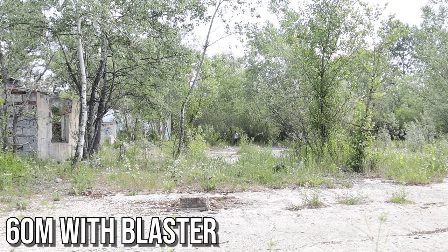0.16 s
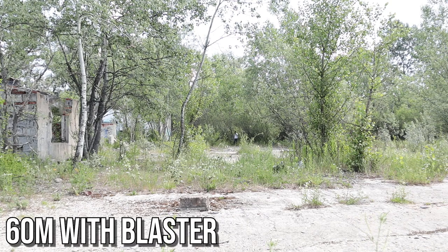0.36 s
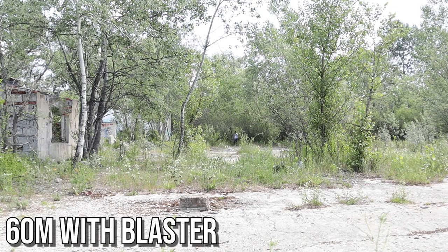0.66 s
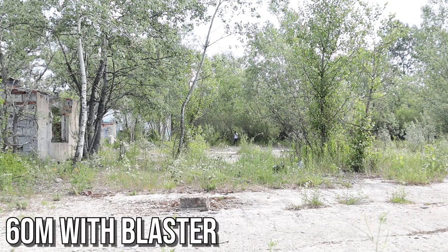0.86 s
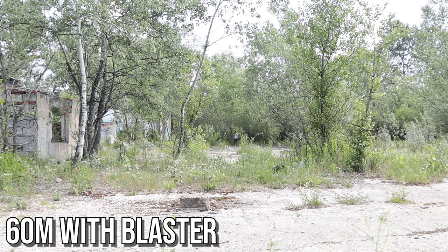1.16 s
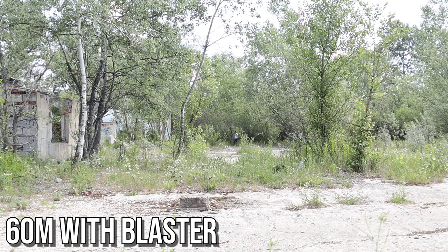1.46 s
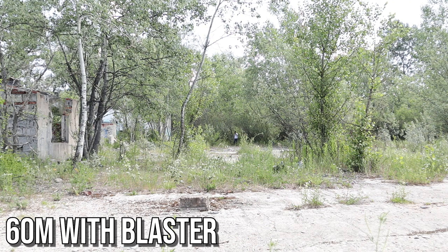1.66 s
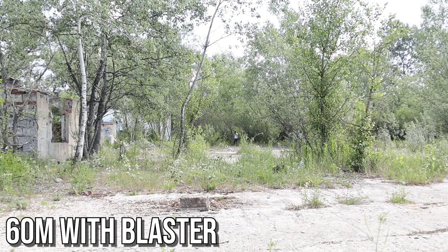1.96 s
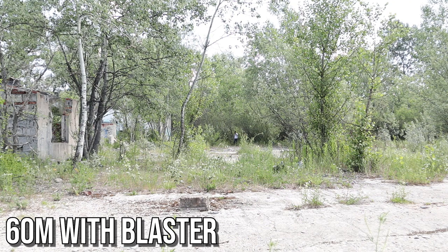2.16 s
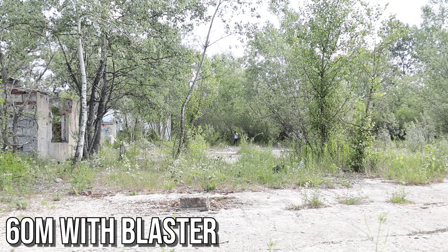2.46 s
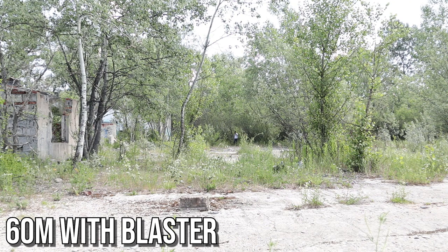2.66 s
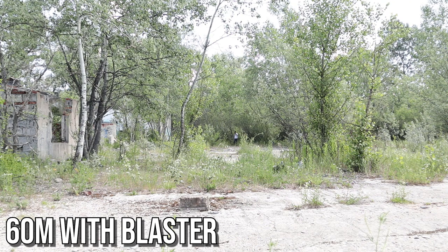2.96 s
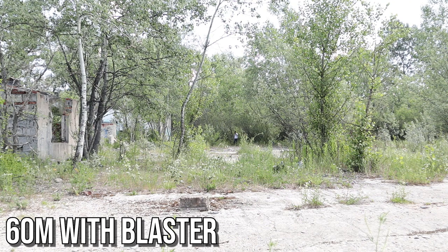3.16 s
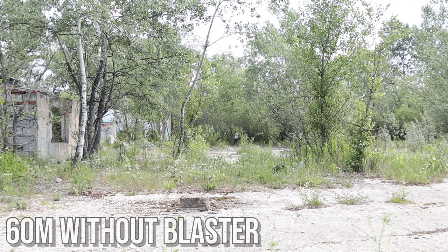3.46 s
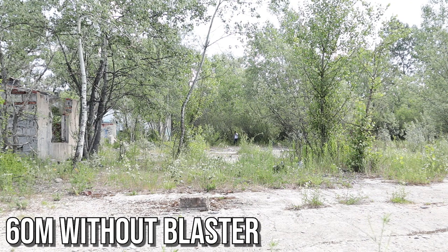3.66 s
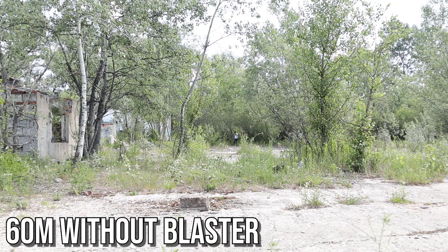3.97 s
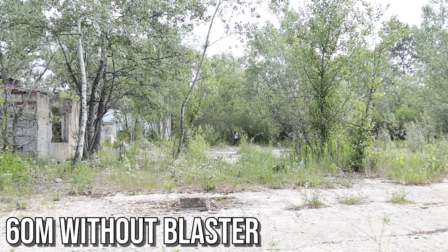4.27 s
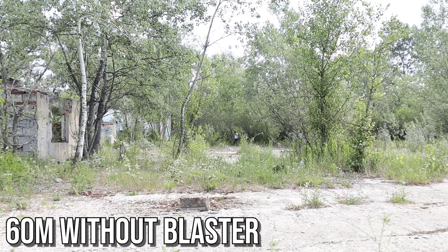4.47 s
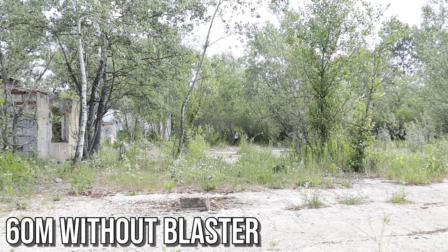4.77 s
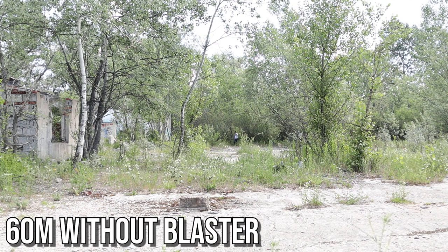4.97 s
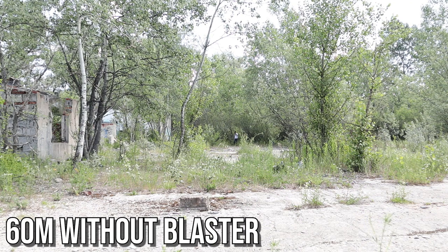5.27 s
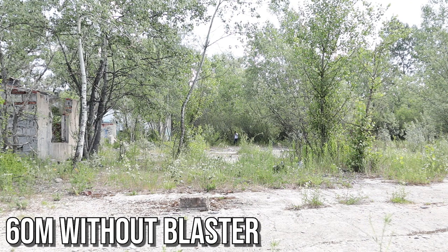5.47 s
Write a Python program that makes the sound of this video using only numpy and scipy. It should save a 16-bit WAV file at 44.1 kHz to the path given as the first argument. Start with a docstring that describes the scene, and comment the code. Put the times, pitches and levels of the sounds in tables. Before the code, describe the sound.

Single airsoft shots snap and echo among trees, three sharper then three softer, with pellet hits and quiet birdsong.

```python
"""An electric airsoft rifle fires single shots across an overgrown lot: blaster cup on, then bare muzzle.
Each shot is a short gear whine, the piston's slam and a pop of air; walls and trees throw it back.
Pellets strike nearby, some followed by a soft hissy echo or a faint rustle. A warbler whistles a
falling phrase and a second bird calls far off, over faint outdoor air and a low rumble."""
import sys
import numpy as np
from scipy import signal
from scipy.io import wavfile
from scipy.ndimage import uniform_filter1d

SR = 44100
rng = np.random.default_rng(int(sys.argv[2]) if len(sys.argv) > 2 else 0)


def transcribe(signal):
    """Save signal, clipped to [-1, 1], as a 16-bit WAV file at the path in sys.argv[1]."""
    frames = np.atleast_2d(signal).T
    limited = np.clip(frames, -1, 1)
    pcm = np.round(limited * 32767).astype(np.int16)
    wavfile.write(sys.argv[1], SR, pcm)


N = 247842

# (slam time [s], pop gain [dB], gearbox gain [dB], muzzle [0 blaster cup, 1 bare])
SHOTS = [(-.101, 0, -12, 0), (0.7495, -0.5, -11.5, 0), (1.674, -1, -11.5, 0), (2.645, 0, -11, 0),
         (3.5942, -7.5, -11.5, 1), (4.4408, -7.5, -11, 1), (5.3884, -7.5, -11.5, 1)]


def shot(pop_db, gearbox_db, bare, wall_response, lead_s):
    """One firing cycle with its echoes; the piston slams at lead_s."""
    mechanism = amp(gearbox_db) * gearbox(lead_s)
    pop, ringing = muzzle(pop_db, bare, lead_s)
    echoes = signal.fftconvolve(pop, wall_response)[:SR]
    # the pop is aimed down range; the gearbox radiates all round and feeds the trees more
    radiated = mechanism + amp(-12.5) * pop
    scatter = trees(radiated, near_db=-4.5, far_db=-10, onset_s=.012, patchy_db=1.5, size=128)
    blurred_ring = trees(ringing, near_db=-5, far_db=-8, onset_s=.017, patchy_db=4, size=512)
    return mechanism + pop + ringing + puff(lead_s) + echoes + scatter + blurred_ring


# pop spectrum per muzzle: (frequency [Hz], gain [dB])
CUP_POP = [(60, -70), (400, -31.5), (950, -21), (1300, 4), (1600, 4.5), (2200, -1.5), (3000, -4), (3800, 1),
           (5000, -9), (6500, -27), (8000, -31), (10500, -14.5), (13000, -41), (16000, -47)]
BARE_POP = [(60, -21.5), (800, -20), (1300, -13), (2200, -7), (2750, -13.5), (3300, -12), (4300, -10),
            (5100, 1.5), (5900, -10), (8000, -25), (10000, -35), (16000, -64)]
# muzzle modes: (frequency [Hz], gain [dB], t60 [s])
CUP_MODES = [(1335, -39, .06), (1457, -38, .075), (1604, -36, .03), (1715, -41, .05), (1900, -41, .05),
             (3892, -44, .06)]
BARE_MODES = [(1631, -41, .035), (3321, -39, .09), (3790, -39, .03), (5071, -30, .025), (5405, -39, .06)]


def muzzle(db, bare, lead_s):
    """The piston's crack leaves through the muzzle and sets it ringing."""
    spectrum, modes = (BARE_POP, BARE_MODES) if bare else (CUP_POP, CUP_MODES)
    pop, ringing = np.zeros((2, SR))
    add(pop, lead_s, amp(db) * click(spectrum))
    add(ringing, lead_s, amp(db) * ring(modes))
    return pop, ringing


# motor start, piston release, piston run, slam, shell chatter: (time from slam [s], gain [dB], decay [s])
KNOCKS = [(-.048, -20.5, 0.0024), (-.0041, -6, .0008), (-.0023, -2.5, .002), (0, -1, 0.0025),
          (.0025, -0.5, 0.0093)]
# gearbox shell response: (frequency [Hz], gain [dB])
SHELL = [(30, -24), (100, -3), (300, -36), (700, -8.5), (1100, -4), (1500, -2), (2000, -3), (2700, -4.5),
         (3600, 3), (4500, 0), (5400, 2), (6500, -8.5), (8000, -15.5), (11500, -14), (16000, -37)]


def gearbox(lead_s, wind_up_s=.048):
    """The motor winds the spring and the piston slams; both sound through the shell."""
    drive = np.zeros(SR)
    add(drive, lead_s - wind_up_s, gear_whine(wind_up_s))
    for time_s, db, decay_s in KNOCKS:
        add(drive, lead_s + time_s, amp(db) * rattle(decay_s))
    return signal.fftconvolve(drive, click(SHELL))[:SR]


def gear_whine(length_s, start_hz=553, limit_hz=2215, spin_up_s=.04, attack_s=.018, release_s=.012):
    """Gear teeth whirr upward, unevenly, as the motor gathers speed."""
    t = np.arange(0, length_s, 1 / SR)
    mesh_hz = limit_hz + (start_hz - limit_hz) * np.exp(-t / spin_up_s)
    jitter = .028 * unit_rms(uniform_filter1d(rng.standard_normal(len(t)), size=90))
    cycles = np.cumsum(mesh_hz * (1 + jitter)) / SR
    teeth = sum(np.cos(2 * np.pi * (k * cycles + rng.random())) for k in range(1, 5))
    grind = band(rng.standard_normal(len(t)), hz=3800, width_hz=6100)
    envelope = np.minimum(t / attack_s, 1) * np.minimum((length_s - t) / release_s, 1)
    return amp(-41.5) * envelope * unit_rms(unit_rms(teeth) + unit_rms(grind))


# puff spectrum: (frequency [Hz], gain [dB])
PUFF = [(30, -9), (150, 7.5), (260, -14), (350, 3), (600, -4.5), (850, 0), (1300, -23), (3000, -3),
        (7000, -23), (11500, -25), (16000, -14)]


def puff(lead_s):
    """Soft air follows the pellet out."""
    out = np.zeros(SR)
    add(out, lead_s + .003, amp(-24.5) * signal.fftconvolve(rattle(decay_s=.0029), click(PUFF)))
    return out


# ground, ruin, tree line: (delay [s], gain [dB], centre [Hz], width [Hz], diffuse share [0-1])
ECHOES = [(.0005, -17, 4500, 6860, 0), (.0038, -13, 2200, 3450, 0.12), (.0069, -9.5, 2000, 3670, 0),
          (.010, -15, 1600, 2470, 0), (0.018, -18, 3440, 2000, 0.8), (.0352, -11, 1450, 110, 0),
          (.0387, -3.5, 1450, 360, 0), (.0442, -10, 1450, 110, 0), (0.065, -30, 2500, 4000, 0.2),
          (0.085, -23, 3480, 4000, 0.49), (.194, -28, 1900, 2500, 0.6), (0.432, -27.5, 1400, 600, 0.39)]


def walls(smear_s=.014):
    """Impulse response of the distinct echoes, each coloured and partly smeared by its surface."""
    response = np.zeros(SR)
    for delay_s, db, hz, width_hz, diffuse in ECHOES:
        bounce = np.sqrt(1 - diffuse) * signal.unit_impulse(SR)
        add(bounce, 0, np.sqrt(diffuse) * rattle(smear_s))
        add(response, delay_s, amp(db) * band(bounce, hz, width_hz))
    return response


# tree scatter spectrum: (frequency [Hz], gain [dB])
SCATTER = [(100, -27), (700, -3.5), (1500, 2), (2500, 1.5), (4000, 2), (5500, 0), (8000, -1), (15000, -4.5)]
# decay of near bushes and far wood: (frequency [Hz], t60 [s])
NEAR_T60 = [(100, 0.073), (700, 0.46), (1500, 0.29), (5000, 0.28), (9000, 0.27), (15000, 0.28)]
FAR_T60 = [(100, .5), (1500, 1.27), (5000, 0.86), (9000, 0.52), (15000, 1.05)]


def trees(x, near_db, far_db, onset_s, patchy_db, size):
    """Countless small reflections: bushes die away quickly, the wood behind them lingers."""
    hz, t, spectrum = signal.stft(x, SR, nperseg=size)
    t = t[t < 1]
    build_up = (1 - np.exp(-(t / onset_s) ** 2)) ** 2
    response = 0
    for db, t60_curve in (near_db, NEAR_T60), (far_db, FAR_T60):
        fade = build_up * amp(-60 * t / curve_at(t60_curve, hz)[:, None]) ** 2
        band_power = amp(db + curve_at(SCATTER, hz)[:, None]) ** 2
        response = response + band_power * fade / fade.sum(1, keepdims=True)
    power = signal.fftconvolve(abs(spectrum) ** 2, response, axes=1)[:, :spectrum.shape[1]]
    noise = signal.stft(rng.standard_normal(len(x)), SR, nperseg=size)[2]
    # clumped trunks reflect unevenly
    clumps = unit_rms(uniform_filter1d(rng.standard_normal(spectrum.shape), size=12, axis=0))
    noise *= amp(patchy_db * clumps)
    return signal.istft(np.sqrt(abs(power)) * noise / noise.std(), SR)[1][:len(x)]


# strikes: (time [s], level [dB], tilt [dB/octave], ring [Hz], ring gain [dB], t60 [s], chatter [dB])
PELLETS = [(0.808, -9, 4, 12600, -28, 0.056, 0.5), (0.882, -11, -3, 5820, -25, 0.025, 1.5),
           (1.2125, -21, 7, 4410, -26, 0.068, 0.5), (1.88, -13.5, -2.5, 2980, -24, 0.029, 9),
           (2.8098, -20, 0.5, 6150, -37, .1, 20), (2.918, -23.5, -5.5, 3450, -28, 0.05, 6),
           (5.09, -34, -4, 5500, -33, .03, 6)]
# strike spectrum before tilt: (frequency [Hz], gain [dB])
STRIKE = [(200, -31), (1200, -15), (2000, -15.5), (2800, -2.5), (4000, -7.5), (5900, 0.5), (7000, -8),
          (10000, -9.5), (12500, -11.5), (16000, -24)]


def pellet(db, tilt_db, ring_hz, ring_db, t60_s, chatter_db):
    """A pellet snaps against something hard, which chatters and rings briefly."""
    hit, contacts = np.zeros((2, SR))
    add(contacts, 0, rattle(decay_s=.0016))
    add(contacts, 0, amp(chatter_db) * rattle(decay_s=.015, size=4096))
    add(hit, 0, unit_energy(signal.fftconvolve(contacts, click(STRIKE, tilt_db))))
    add(hit, 0, ring([(ring_hz, ring_db, t60_s)]))
    hit = amp(db) * unit_energy(hit)
    return hit + trees(hit, near_db=-14, far_db=-12, onset_s=.002, patchy_db=1, size=64)


# two soft echoes, each about 60 ms after a pellet strike, then two faint rustles:
# (time [s], gain [dB], centre [Hz], width [Hz], decay [s])
HISSES = [(0.937, -50, 5400, 2800, 0.02), (1.938, -51.5, 5500, 3220, 0.021), (2.84, -58, 8400, 7000, 0.041),
          (2.96, -62.5, 7460, 4500, 0.026)]


def hiss(db, hz, width_hz, decay_s):
    """Grainy noise swells and fades: a strike's echo off the surroundings, or a faint rustle."""
    age = np.arange(SR // 2) / SR / decay_s
    grains = rng.standard_normal(len(age)) * rng.exponential(1, len(age))
    noise = unit_rms(band(band(grains, hz, width_hz), hz, width_hz))
    envelope = age * np.exp(1 - age) / 2
    return amp(db) * envelope * noise


# syllable contours: (time [s], pitch [Hz], gain [dB]), scaled per note
ARCH = [(0, 4280, -14), (.028, 4480, 2.5), (.048, 5000, -8.5), (.06, 5660, -6), (.076, 5500, -2),
        (.1, 4220, -13)]
SLUR = [(0, 4700, -20), (.028, 4636, -13), (.042, 4616, -0.5), (.075, 4200, -12.5), (.115, 3510, -14.5)]
FLICK = [(0, 2930, -17), (.02, 3000, -12), (.033, 3900, -6.5), (.064, 3970, 0), (.078, 4700, -5)]
SYLLABLES = {"arch": ARCH, "slur": SLUR, "flick": FLICK}
# phrase: (time [s], pitch [ratio], length [ratio], gain [dB], syllable)
NOTES = [(3.765, 1.02, .95, -58.5, "arch"), (3.928, 1.01, 1.0, -54, "arch"),
         (4.105, 0.99, 1.0, -51, "arch"), (4.28, 0.99, 0.99, -44, "slur"), (4.475, 1.0, 1, -44, "slur"),
         (4.668, 0.99, 0.9, -47, "slur"), (4.895, .825, 0.79, -51.5, "slur"),
         (5.03, 1.004, 1.0, -50.5, "flick"), (5.192, .97, 1.0, -49, "flick"),
         (5.362, 0.91, 1.0, -44, "flick")]


def warbler(gain_db=-2.5, waver=.0057, flutter_db=2, echo_s=.046, echo_db=-11.5):
    """Gliding whistles flutter through the leaves; the tree line answers."""
    song = np.zeros(N)
    for start_s, pitch, stretch, note_db, syllable in NOTES:
        times_s, hz, db = np.transpose(SYLLABLES[syllable])
        t = np.arange(0, times_s[-1], 1 / SR / stretch)
        wobble, flutter = unit_rms(uniform_filter1d(rng.standard_normal((2, len(t))), size=160))
        glide_hz = pitch * uniform_filter1d(np.interp(t, times_s, hz), size=400)
        cycles = np.cumsum(glide_hz * (1 + waver * wobble)) / SR
        level_db = gain_db + note_db + np.interp(t, times_s, db) + flutter_db * flutter
        whistle = amp(level_db) * signal.windows.tukey(len(t), .12) * np.sin(2 * np.pi * cycles)
        add(song, start_s, whistle)
        add(song, start_s + echo_s, amp(echo_db) * whistle)
    return song + trees(song, near_db=-6, far_db=-5.5, onset_s=.0079, patchy_db=2.5, size=384)


# distant whistles: (time [s], length [s], start pitch [Hz], glide [Hz/s], gain [dB])
FAR_CALLS = [(0.436, 0.099, 2100, 2200, -67.5), (1.083, 0.17, 2150, -500, -66)]


def far_bird():
    """Plain whistles, heard only as their scatter among the trees."""
    calls = np.zeros(N)
    for start_s, length_s, hz, glide_hz_per_s, db in FAR_CALLS:
        t = np.arange(0, length_s, 1 / SR)
        cycles = np.cumsum(hz + glide_hz_per_s * t) / SR
        add(calls, start_s, amp(db) * signal.windows.tukey(len(t)) * np.sin(2 * np.pi * cycles))
    return trees(calls, near_db=-.5, far_db=-8, onset_s=.008, patchy_db=1, size=512)


# outdoor air spectrum: (frequency [Hz], relative density [dB])
AIR = [(12, -22), (20, -12), (53, -14.5), (88, -3.5), (182, -4), (216, -8.5), (337, -6.5), (388, -11.5),
       (923, -8.5), (1440, -10.5), (1660, -17), (1910, -18), (4670, -24), (14300, -30.5), (16000, -31)]


def air(level_db=-60, patchy_db=1.2):
    """Faint outdoor wash in drifting patches."""
    hz, _, noise = signal.stft(rng.standard_normal(N), SR, nperseg=2048)
    patches = uniform_filter1d(rng.standard_normal(noise.shape), size=16, axis=0)
    patches = unit_rms(uniform_filter1d(patches, size=6, axis=1))
    gain = amp(curve_at(AIR, hz)[:, None] + patchy_db * patches)
    wash = signal.istft(noise * gain, SR)[1][:N]
    return amp(level_db) * unit_rms(wash)


# rumble swells: (peak time [s], half length [s], level [dB])
SWELLS = [(0.853, 0.41, -66.5), (1.55, .2, -69), (2.75, 0.57, -72)]


def rumble(hz=53.2, width_hz=20, rest_db=-78):
    """Low narrow-band noise that comes and goes."""
    t = np.arange(N) / SR
    noise = unit_rms(band(band(rng.standard_normal(N), hz, width_hz), hz, width_hz))
    swells = sum(amp(db) * np.exp(-((t - peak_s) / half_s) ** 2) for peak_s, half_s, db in SWELLS)
    return noise * (amp(rest_db) + swells)


def click(points, tilt_db=0, size=2048):
    """Minimum-phase click of energy 1; tilt_db per octave applies above 1 kHz."""
    hz = abs(np.fft.fftfreq(size, 1 / SR))
    log_gain = np.log(amp(curve_at(points, hz) + tilt_db * np.log2(np.maximum(hz, 1000))))
    spectrum = np.exp(np.conj(signal.hilbert(log_gain)))
    return unit_energy(np.fft.ifft(spectrum).real[:size // 2])


def rattle(decay_s, size=2048):
    """Dying burst of tiny contacts, energy 1."""
    return unit_energy(rng.standard_normal(size) * np.exp(-np.arange(size) / SR / decay_s))


def ring(modes, size=8192):
    """Struck modes as decaying sines."""
    t = np.arange(size) / SR
    return sum(amp(db - 60 * t / t60_s) * np.sin(2 * np.pi * hz * t) for hz, db, t60_s in modes)


def band(x, hz, width_hz):
    """One resonance, peak gain 1."""
    return signal.lfilter(*signal.iirpeak(hz, hz / width_hz, SR), x)


def curve_at(points, hz):
    """Interpolates on a log-frequency axis."""
    knots_hz, values = np.transpose(points)
    return np.interp(np.log(hz + 1), np.log(knots_hz + 1), values)


def add(mix, time_s, sound):
    """Mixes a sound in at time_s, which may be negative."""
    at = round(time_s * SR)
    sound = sound[max(-at, 0):]
    part = mix[max(at, 0):][:len(sound)]
    part += sound[:len(part)]


def amp(db):
    return 10 ** (np.asarray(db) / 20)


def unit_rms(x):
    return x / np.sqrt(np.mean(x ** 2) + 1e-20)


def unit_energy(x):
    return x / (np.linalg.norm(x) + 1e-20)


def scene(lead_s=.1):
    """Rifle, pellets, birds and air, identical in both channels."""
    mix = np.zeros(N)
    wall_response = walls()
    for time_s, pop_db, gearbox_db, bare in SHOTS:
        add(mix, time_s - lead_s, shot(pop_db, gearbox_db, bare, wall_response, lead_s))
    for time_s, *strike in PELLETS:
        add(mix, time_s, pellet(*strike))
    for time_s, *burst in HISSES:
        add(mix, time_s, hiss(*burst))
    mix += warbler() + far_bird() + air() + rumble()
    return np.array([mix, mix])


def record(dry):
    """Low-pass at 16.1 kHz."""
    lowpass = signal.firwin(511, 16100, window=("kaiser", 9), fs=SR)
    return signal.oaconvolve(dry, lowpass[None], "same")


dry = scene()
out = record(dry)
transcribe(out)
```